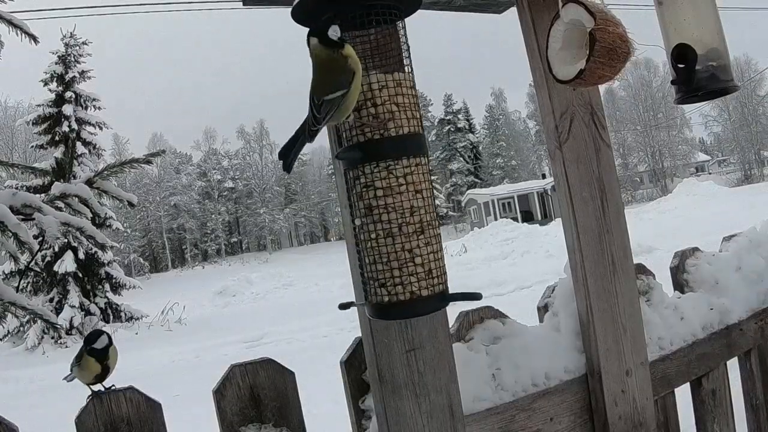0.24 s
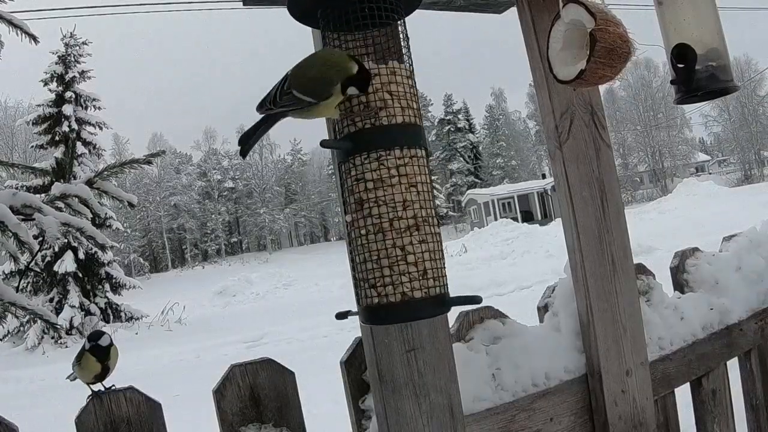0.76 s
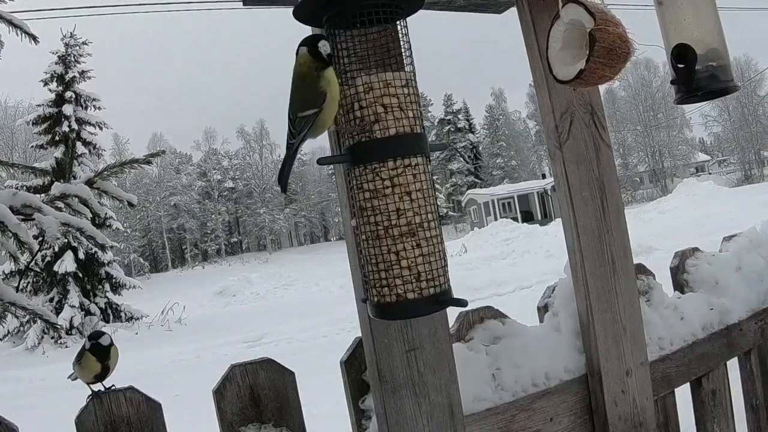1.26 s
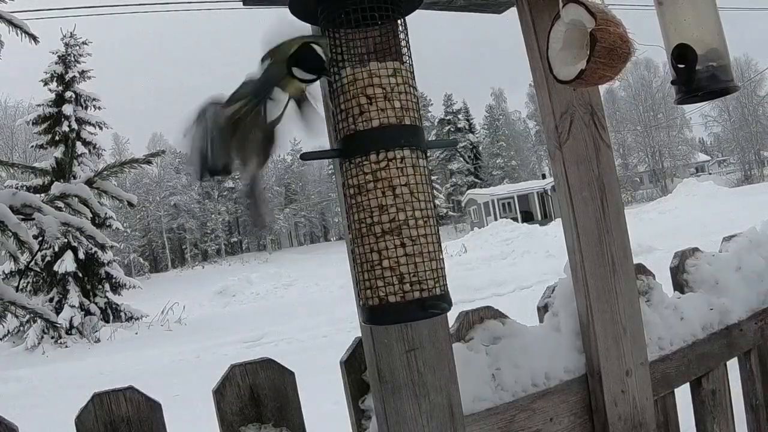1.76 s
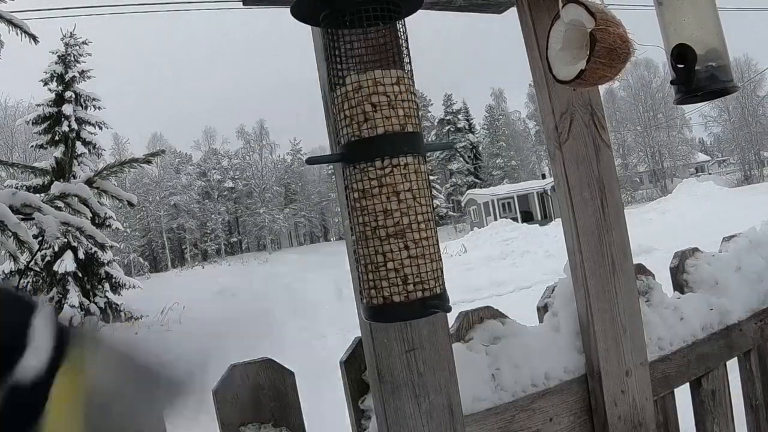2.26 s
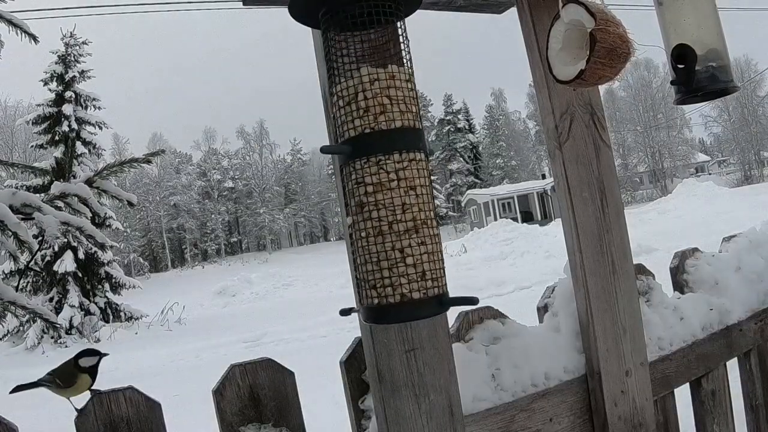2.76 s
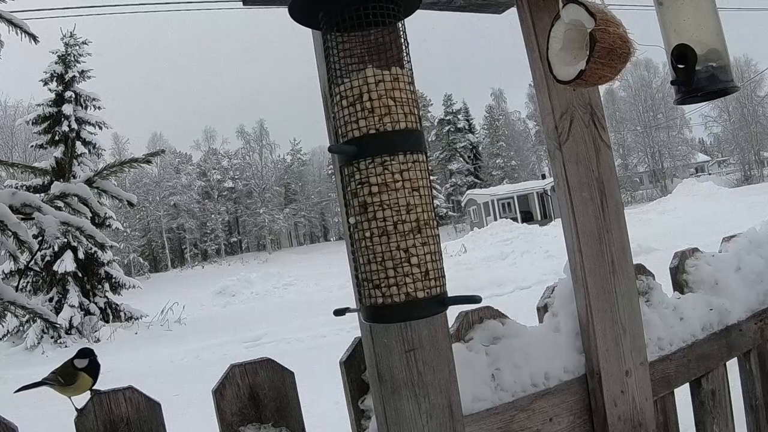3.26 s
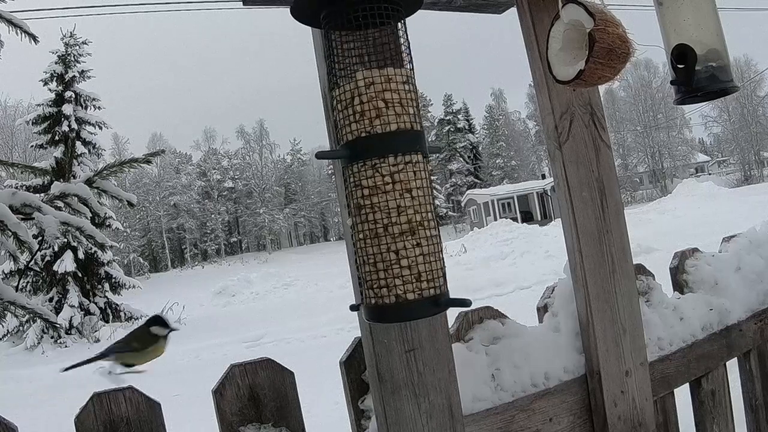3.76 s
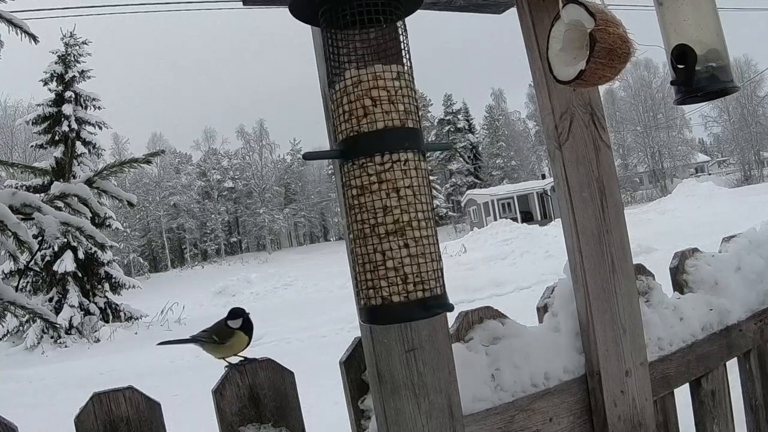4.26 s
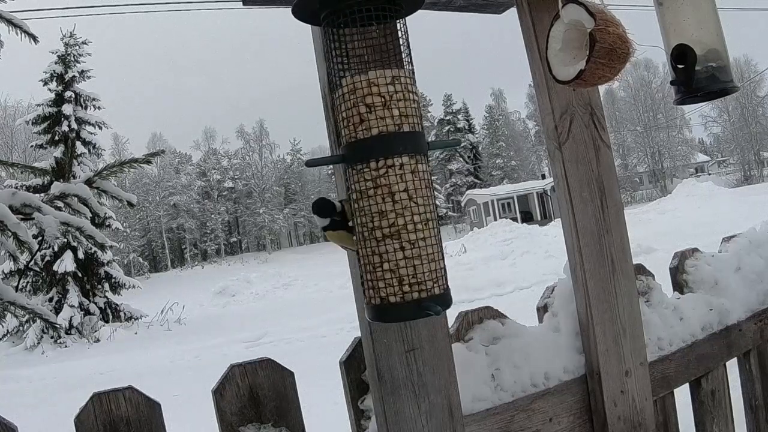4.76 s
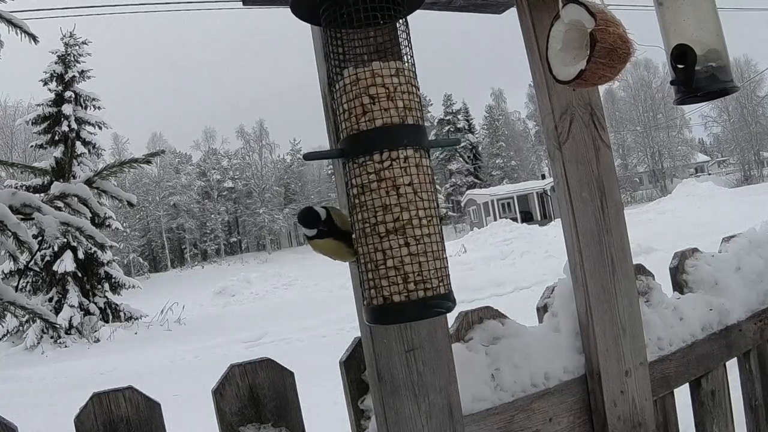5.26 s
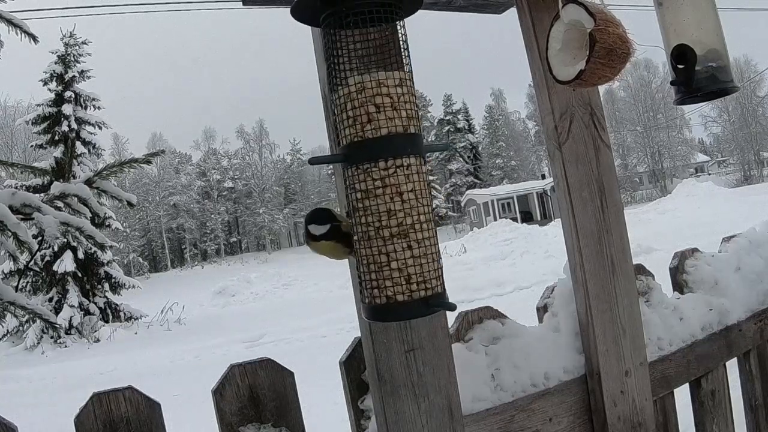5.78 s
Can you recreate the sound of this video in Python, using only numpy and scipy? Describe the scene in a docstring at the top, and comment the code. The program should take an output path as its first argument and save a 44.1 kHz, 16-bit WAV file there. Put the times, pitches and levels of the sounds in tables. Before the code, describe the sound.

A quiet winter field, a soft low rumble with barely audible distant hoots, is heard from a microphone very near a feeder. A brief wing puff and clicks open it; at 0.35 s comes a thin slurred double whistle falling raspily, with a short echo. Sparse dry ticks follow at 0.7-1.5 s. From 1.7 s wings whirr, and at 1.8-1.95 s sharp cracks and scraping mark a clash, with tiny chirps and a piercing very high squeak at 1.97 s. Heavy close wingbeats thump the microphone until 2.35 s, then airy gusts to 2.65 s. The sound, nearly mono at first, is now wide. A call at 3.15 s, soft feather shuffle and light gust at 3.3 s. Faint claw and mesh ticks at 4.6-5.15 s, a light flutter at 5.3 s, stronger wind buffets from 5.6 s, a short chirp at 5.67 s, and flapping thumps growing to the end at 6 s.

```python
"""Great tits at a winter feeder

Great tits squabble at a peanut feeder on a snowy porch, an arm's length from a small stereo microphone.
Thin slurred calls are gliding sine tones; beak and claw clicks are short filtered bursts that the posts echo.
Wings whirr past as noise beating with the stroke, their pressure waves and thumps buffeting the microphone.
Light wind on the ports is throbbing noise; the sound opens from mono to stereo over a quiet winter field."""
import sys
import numpy as np
from scipy import signal
from scipy.fft import rfft, irfft, next_fast_len
from scipy.io import wavfile

SR = 44100
rng = np.random.default_rng(int(sys.argv[2]) if len(sys.argv) > 2 else 0)


def inscribe(sig):
    """Save sig as 16-bit PCM at rate SR to the path in sys.argv[1].

    A 1-D sig is mono; a 2-D sig holds one channel per row.
    Samples are clipped to [-1, 1] before scaling.
    """
    pcm = np.round(np.clip(np.atleast_2d(sig).T, -1, 1) * 32767)
    wavfile.write(sys.argv[1], SR, pcm.astype(np.int16))


N = 265482
TIME = np.arange(N) / SR
OPPOSED = np.array([[1], [-1]])  # left and right in opposite phase


def undb(db):
    """Decibels to gain."""
    return 10 ** (np.asarray(db) / 20)


def unit(x):
    """Scale to rms 1."""
    return x / np.sqrt(np.mean(x ** 2))


def colour(x, points):
    """Filter by (Hz, dB) points joined on a log-frequency axis."""
    hz, db = np.transpose(points)
    size = next_fast_len(N + 4096)
    f = np.maximum(np.fft.rfftfreq(size, 1 / SR), 1)
    gain = undb(np.interp(np.log(f), np.log(hz), db))
    return irfft(rfft(x, size) * gain, size)[:N]


def noise(points):
    """Noise of a given spectrum, rms 1."""
    return unit(colour(rng.standard_normal(N), points))


def resonate(x, hz, width_hz):
    """Two-pole resonance."""
    b, a = signal.iirpeak(hz, hz / width_hz, fs=SR)
    return signal.lfilter(b, a, x)


def band(hz, width_hz, size):
    """Noise through a resonance twice, rms 1."""
    once = resonate(rng.standard_normal(size), hz, width_hz)
    return unit(resonate(once, hz, width_hz))


def walk(rate):
    """Random values, `rate` a second, joined by straight lines; the last is held if they run out."""
    knots = rng.standard_normal(8192)
    return np.interp(TIME * rate, np.arange(len(knots)), knots)


def throb(phase, depth):
    """One rounded peak a cycle, rms 1."""
    return unit(np.exp(depth * np.cos(phase)))


def envelope(t, attack, hold, release):
    """Straight rise, level until `hold` seconds from the start, exponential fall."""
    return np.clip(t / attack, 0, 1) * np.exp(-np.maximum(t - hold, 0) / release)


def pan(x, db):
    """Place a sound by its left minus right level."""
    return x * undb(OPPOSED * db / 2)


def add(out, start, x):
    """Mix a short sound in at a time."""
    i = max(int(start * SR), 0)
    out[..., i:i + x.shape[-1]] += x[..., :max(N - i, 0)]


# Whistled notes close to the microphone; two that overlap are the two sides of one syrinx or two birds.
# Each row: start in seconds, hold in seconds from the start, plunge in seconds, release in seconds,
# held pitch in Hz, slur from above in Hz, arch in Hz, level in dB before the beak's bass loss, swell in dB,
# plunge accent in dB, overtone in dB, left minus right in dB, left lag in seconds, echo in dB.
CALL_NOTES = [ (0.3436, 0.036, 0.014, .002, 4640, 106, -13, -58, 0, -2.5, -38, 2, 0, -13.5),
              (.346, 0.046, 0.0029, 0.0022, 5790, 497, 1002, -52.5, 17, 0, -23, 4, 0, -39),
              (1.921, 0.0073, 0.00072, 0.0046, 4380, 296, 5, -48, 13, 0, -31, 2, 0, -22),
              (1.924, 0.012, 0.0013, 0.0037, 8450, 200, -2, -62.5, 12, 0, -30, -11, 0, -12),
              (1.972, .0045, 0.00085, 0.003, 4170, 223, -1, -51.5, 2, 0, -4, 1, 0, -20),
              (1.972, 0.083, 0, .002, 8277, 420, 111, -39.5, 8, 0, -40, -6, -.00004, -14.5),
              (2.055, .0022, .0056, .0005, 8330, 0, 0, -42, 6, 5, -47, 7, .00003, -24),
              (3.1567, .039, 0.015, 0.0025, 4610, 218, 23, -54.5, 1, 3.5, -23, 4.5, -.00002, -36),
              (5.673, 0.016, 0.00018, 0.0037, 4936, 892, 5, -48, 0, -2, -34, 5.5, -.00002, -31)]
# Reflections of a call from the posts, the roof and the wall.
# Each row: delay in seconds, level in dB added to the note's own echo level.
CALL_ECHOES = [(.0052, 4), (0.012, 5), (.027, 0), (.037, -1.5)]
NOTE_ATTACK_S, SLUR_S = 0.0015, 0.00865  # a note opens quickly and settles onto its pitch
ARCH_AT, ARCH_WIDTH = 0.45, .38  # place and width of the arch, as shares of the hold
PLUNGE_S, PLUNGE_FLOOR = 0.0082, .29  # the closing plunge heads for this share of the pitch
SHORTEST_PLUNGE_S, ACCENT_S = .005, .002  # a plunge no longer than the first is left out
PLUNGE_RICHNESS = .55  # overtone gain gained per share of pitch lost below plunge_hz
BEAK_HZ, OVERTONE_TOP_HZ = 2110, 9100  # weak radiation below the first, fading overtones above the second
REFLECT_POWER = 14  # narrow posts throw back little of a note once it has dropped in pitch


def calls(waver=0.0032, flutter_db=-1.5, rasp=0.0022, plunge_rasp=0.043, plunge_hz=4400):
    """Nearly pure notes slur down and swell; some end in a raspy plunge rich in overtones; the porch echoes."""
    out = np.zeros((2, N))
    wobble = 1 + waver * walk(70)
    flutter = flutter_db * walk(90)
    jitter = walk(1500)
    for (start, hold, plunge, release, hz, slur_hz, arch_hz, db, swell_db,
         accent_db, overtone_db, pan_db, lag, echo_db) in CALL_NOTES:
        plunge = plunge if plunge > SHORTEST_PLUNGE_S else 0
        on = (TIME >= start) & (TIME < start + hold + plunge + 10 * release)
        t = TIME[on] - start
        held = np.minimum(t / hold, 1)
        falling = np.clip(t - hold, 0, plunge)
        fallen = 1 - np.exp(-(falling / PLUNGE_S) ** 2)

        slur = slur_hz * np.exp(-t / SLUR_S)
        arch = arch_hz * np.exp(-((t / hold - ARCH_AT) / ARCH_WIDTH) ** 2)
        unsteady = wobble[on] + (rasp + plunge_rasp * fallen) * jitter[on]
        pitch = (hz + slur + arch) * unsteady * (1 - (1 - PLUNGE_FLOOR) * fallen)

        accent = accent_db * np.minimum(falling / ACCENT_S, 1)
        effort = undb(db - swell_db * (1 - held) + accent + flutter[on])
        beak = 1 / np.hypot(1, (BEAK_HZ / pitch) ** 3)
        phase = 2 * np.pi * (np.cumsum(pitch) / SR - OPPOSED * pitch * lag / 2)
        overtone = undb(overtone_db) + PLUNGE_RICHNESS * np.clip(1 - pitch / plunge_hz, 0, .5)
        tone = np.sin(phase)
        for k in range(2, 5):
            audible = (k * pitch < SR / 2) / np.hypot(1, (k * pitch / OVERTONE_TOP_HZ) ** 2)
            tone = tone + overtone ** (k - 1) * np.sin(k * phase) * audible
        note = np.sqrt(2) * tone * effort * beak * envelope(t, NOTE_ATTACK_S, hold + plunge, release)
        out[:, on] += pan(note, pan_db)
        for delay, wall_db in CALL_ECHOES:
            add(out, start + delay, undb(echo_db + wall_db) * note * (1 - fallen) ** REFLECT_POWER)
    return out


# Birds flying past the microphone, or in to land.
# Each row: start in seconds, end in seconds, closest moment in seconds, passing time in seconds,
# pushed air in dB, feather swish in dB, swish side against mid in dB, moment of one downstroke in seconds,
# beats per second, nearness from 0 to 1.
FLIGHTS_PAST = [ (-.05, 0.07, 0, 0.062, -40.5, -69.5, -7, 0.013, 22, .92),
                (1.686, 1.855, 1.87, 0.18, -48, -70.5, -6, 1.67, 22.7, 0.6),
                (1.795, 2.002, 2, 0.27, -59, -62, -7, 1.73, 18.3, 0.4),
                (1.988, 2.195, 2, 0.12, -33, -64, -2, 2.133, 23.3, .98),
                (2.197, 2.36, 2.28, .13, -34.5, -64, -2, 2.304, 21, 0.95),
                (2.366, 2.477, 2.5, 0.26, -55, -68, -2, 2.52, 24, 0.5),
                (5.236, 5.44, 5.5, 0.2, -45, -68.5, 0.5, 5.382, 23.4, 0.14),
                (5.756, 6.1, 6, 0.3, -35, -66.5, -1, 5.9, 18.7, 0.98)]
# Air pushed by a very near wing. Each row: frequency in Hz, density in dB.
NEAR_AIR = [(12, -42), (20, -2.5), (43, 5), (80, -7), (134, -9), (210, -15.5), (262, -25), (386, -32.5),
            (700, -53), (1000, -64), (1540, -100)]
# Air of a wing further off. Each row: frequency in Hz, density in dB.
FAR_WHIRR = [(20, -20), (65, -2.5), (150, 4), (250, -5.5), (400, -20), (800, -33), (2000, -79)]
# Rustle of feathers. Each row: frequency in Hz, density in dB.
FEATHER_RUSTLE = [(300, 6.5), (700, 4), (1500, 4.5), (3000, 2), (6500, 0), (8500, -18), (11000, -22.5),
                  (15000, -32)]
AIR_FALLOFF, SWISH_FALLOFF = 3.57, 2.3  # powers of distance: pushed air dies much faster than sound
FLIGHT_EDGE_S, SWISH_LEAD_S = 0.034, 0.0027  # wings start within a beat; the swish comes just before the puff
AIR_RELEASE_S, SWISH_RELEASE_S = 0.036, 0.063  # dying away once the bird has landed or gone
BEAT_PUSH, TURN_PUSH = 0.27, 0.72  # pressure wave once a beat, and at both turns of the wing


def wings(air_throb=0.47, whirr_throb=1.11, swish_throb=0.21, air_side_db=-11, whirr_side_db=-8,
          grain_db=2.5, uneven_db=1.44):
    """Downstrokes push turbulent air at the microphone and make feathers swish; both fade with distance."""
    puffs = noise(NEAR_AIR) + OPPOSED * undb(air_side_db) * noise(NEAR_AIR)
    whirr = noise(FAR_WHIRR) + OPPOSED * undb(whirr_side_db) * noise(FAR_WHIRR)
    rustle, scattered = noise(FEATHER_RUSTLE), noise(FEATHER_RUSTLE)
    grain = undb(grain_db * walk(650) + uneven_db * walk(70))
    out = np.zeros((2, N))
    for start, end, closest, passing, air_db, swish_db, side_db, downstroke, rate, near in FLIGHTS_PAST:
        away = np.hypot(1, (TIME - closest) / passing)  # distance over the closest distance
        stroke = 2 * np.pi * rate * (TIME - downstroke)
        # only a very near wing is felt as a deep pressure wave; further off it whirrs on both strokes
        wave = BEAT_PUSH * np.cos(stroke) + TURN_PUSH * np.cos(2 * stroke)
        near_air = np.sqrt(near) * throb(stroke, air_throb) * puffs
        far_air = np.sqrt(1 - near) * throb(2 * stroke, whirr_throb) * whirr
        air = near_air + far_air + near * wave

        early_stroke = stroke + 2 * np.pi * rate * SWISH_LEAD_S
        feathers = rustle + OPPOSED * undb(side_db) * scattered
        swish = throb(early_stroke, swish_throb) * grain * feathers

        air_shape = envelope(TIME - start, FLIGHT_EDGE_S, end - start, AIR_RELEASE_S)
        swish_shape = envelope(TIME - start, FLIGHT_EDGE_S, end - start, SWISH_RELEASE_S)
        out += air * undb(air_db) / away ** AIR_FALLOFF * air_shape
        out += swish * undb(swish_db) / away ** SWISH_FALLOFF * swish_shape
    return out


# Crisp flaps of the wing feathers as a bird brakes or turns.
# Each row: middle in seconds, level in dB, half length in seconds, left minus right in dB.
WING_FLAPS = [(1.701, -68.5, .004, 0), (1.743, -68.5, .007, -2), (1.827, -51.5, 0.0038, 3),
              (1.872, -57.5, 0.0026, -2), (1.99, -54, 0.0031, 0), (2.308, -65, 0.0034, 3),
              (2.058, -59, 0.0044, 2), (2.106, -54, 0.0054, -5), (2.137, -57.5, .003, -7),
              (2.179, -55.5, 0.0022, -14), (2.256, -57.5, 0.0023, 3), (2.479, -65, .005, 3),
              (5.299, -65, 0.0049, -3), (5.378, -63, 0.0062, -6), (5.418, -67, .005, -8),
              (5.735, -60.5, .007, -7), (5.831, -61, 0.0081, -9), (5.93, -65, .007, -10),
              (5.971, -57.5, 0.0064, -10), (6.013, -51.5, 0.0088, -6)]
# Sound of one flap. Each row: frequency in Hz, density in dB.
FLAP_SPECTRUM = [(100, 4), (450, 11.5), (900, 3.5), (1700, 4), (3000, 0.5), (6300, -.5), (8500, -17.5),
                 (11000, -27), (15000, -33)]


def flaps(spread=0.6, grain_db=3.0):
    """Stiff feathers slide over each other in a short, grainy burst."""
    feathers = noise(FLAP_SPECTRUM) + OPPOSED * spread * noise(FLAP_SPECTRUM)
    strength = np.zeros((2, N))
    for s, db, length, pan_db in WING_FLAPS:
        strength += pan(undb(db) * np.exp(-((TIME - s) / length) ** 2), pan_db)
    return feathers * undb(grain_db * walk(900)) * strength


# Close wing strokes that thump the microphone.
# Each row: moment in seconds, pressure in dB, half width in seconds, 1 for push or -1 for suction,
# puff of air in dB.
WING_THUMPS = [(.008, -35, 0.0025, -1, -60), (2.051, -30.5, .0013, 1, -52), (2.106, -32, .0016, 1, -46),
               (2.178, -33.5, 0.0019, 1, -47.5), (2.253, -22, .0021, -1, -48),
               (2.304, -25, 0.0019, 1, -55.5), (2.321, -27.5, 0.0027, 1, -59), (5.739, -33, 0.0052, 1, -65),
               (5.838, -31, .005, 1, -54), (5.979, -25, 0.0052, 1, -56), (6.006, -30, 0.0016, 1, -48),
               (6.0135, -20.5, .0015, 1, -46)]
# Turbulence inside a thump. Each row: frequency in Hz, density in dB.
PUFF_SPECTRUM = [(90, -5), (200, 0), (400, -1), (650, -11), (900, -22), (2000, -49)]
PUFF_S = .006  # half length of the turbulence


def thumps():
    """A vortex shed by a close wing: a pressure peak between two shallow troughs, in a puff of turbulence."""
    out, puff = np.zeros(N), noise(PUFF_SPECTRUM)
    for s, db, width, sign, puff_db in WING_THUMPS:
        near = abs(TIME - s) < .05
        t = TIME[near] - s
        u = (t / width) ** 2
        out[near] += sign * undb(db) * (1 - u) * np.exp(-u / 2)
        out[near] += undb(puff_db) * np.exp(-(t / PUFF_S) ** 2) * puff[near]
    return out


# The clearest beak, claw and wing-tip clicks at the feeder.
# Each row: start in seconds, peak in dB, centre in Hz, width in octaves, tail's 60 dB decay in seconds,
# left minus right in dB.
FEEDER_CLICKS = [(.024, -53.5, 4170, 0.7, 0.042, -6), (.096, -60, 2280, 1.9, 0.044, -2),
                 (0.7190, -52, 5060, 1.04, 0.015, -12), (0.7840, -60, 4005, 1.3, 0.024, -1),
                 (.9626, -65.5, 4250, .9, 0.045, 6), (1.5156, -68.5, 4200, 1.3, .023, 0),
                 (1.8123, -40, 3180, 1.5, 0.022, 0), (1.8525, -32.5, 2900, 2.1, 0.0078, 1),
                 (1.9444, -31.5, 2420, 0.83, 0.014, 5), (1.944, -43, 6100, 0.34, 0.017, -1),
                 (2.3564, -55.5, 5370, .9, 0.037, -6), (2.439, -41.5, 6950, 1.5, 0.017, 3),
                 (2.541, -53, 3770, 1.3, .02, -4), (2.962, -51, 6350, 1.7, 0.016, 5),
                 (3.347, -60, 2980, 1.3, .04, -5), (4.581, -64.5, 3400, 1.2, 0.068, -3),
                 (4.616, -64, 4000, 1.7, 0.022, -4), (4.664, -62, 6070, 0.76, .05, -6),
                 (4.746, -58.5, 5660, 0.79, .03, -6), (4.7776, -52.5, 5000, 1, 0.013, -3),
                 (4.797, -60, 5760, 0.92, 0.029, -5), (5.042, -61, 4200, 1.6, 0.022, -4),
                 (5.135, -61, 7500, 1.12, .014, -2), (5.761, -46, 3100, 2.1, 0.015, -2),
                 (5.784, -48, 4040, 1.4, 0.042, -9)]
CRACK, CRACK_S = 1, 0.00053  # the first crack against the tail, and its decay in seconds


def clicks(spread=0.56):
    """Dry ticks on wire mesh, nuts and wood: a crack and a short tail, broad or ringing with what is struck."""
    out, t = np.zeros((2, N)), TIME[:6000]
    for s, db, hz, octaves, t60, pan_db in FEEDER_CLICKS:
        half = 2 ** (octaves / 2)
        decay = undb(-60 * t / t60) + CRACK * np.exp(-t / CRACK_S)
        direct, scattered = rng.standard_normal((2, len(t))) * decay
        body = signal.butter(3, [hz / half, hz * half], "band", fs=SR, output="sos")
        tick = signal.sosfilt(body, direct + OPPOSED * spread * scattered)
        add(out, s, pan(tick * undb(db) / abs(tick).max(), pan_db))
    return out


# Spells of scraping claws and clashing feathers.
# Each row: start in seconds, end in seconds, scrapes per second, level of the strongest in dB.
SCRAPE_SPELLS = [(1.798, 2.029, 45, -54), (4.196, 5.253, 35, -78), (4.551, 5.151, 16, -73),
                 (4.743, 4.802, 90, -76)]


def scratches(scatter_db=4, decay=0.0066):
    """Tiny scrapes at random moments as the birds shift on fence and mesh or brush each other."""
    strength = np.zeros(N)
    for start, end, rate, db in SCRAPE_SPELLS:
        chance = rng.random((256, 2))
        for place, size in chance[:int(rate * (end - start))]:
            level = undb(db + scatter_db * np.sqrt(12) * (size - 1.0))
            add(strength, start + place * (end - start), level * np.exp(-TIME[:1024] / decay))
    return strength * noise(FEATHER_RUSTLE)


def shuffle(s=3.36, width_s=0.067, level_db=-74):
    """A bird on the fence softly shakes its feathers."""
    swell = np.exp(-((TIME - s) / width_s) ** 2)
    return undb(level_db + 2 * walk(100)) * swell * noise(FEATHER_RUSTLE)


def porch(x, t60=.2, wet_db=-20, first_s=.004):
    """Posts, roof and fence scatter a short, weak echo; snow swallows the rest."""
    t = TIME[:SR // 2]
    echo = rng.standard_normal((2, len(t))) * undb(-60 * t / t60) * (t > first_s)
    echo /= np.linalg.norm(echo, axis=1)[:, None]
    return x + undb(wet_db) * signal.fftconvolve(x.mean(axis=0)[None], echo, axes=1)[:, :N]


# Gusts on the microphone ports, each a low buffet and a rush of air that rings in the port.
# Each row: start in seconds, attack in seconds, hold in seconds from the start, buffet in dB, rush in dB,
# ring in Hz before its wander.
PORT_GUSTS = [(2.368, 0.017, 0.024, -41.5, -44, 900), (2.403, 0.0086, 0.015, -41.5, -44, 899),
              (2.43, 0.0076, 0.017, -44, -45, 951), (2.45, .01, 0.064, -50.5, -54.5, 950),
              (2.545, 0.014, 0.027, -56, -49.5, 950), (2.574, 0.01194, .028, -43, -55, 1003),
              (2.61, 0.0075, 0.031, -66, -51, 1300), (3.275, .012, .016, -62, -59, 978),
              (3.312, 0.00784, 0.015, -57, -51, 952), (3.335, 0.013, 0.023, -56, -52.5, 1350),
              (4.852, 0.0121, 0.033, -62, -58.5, 1050), (4.885, .012, 0.023, -60, -50.5, 1000),
              (4.915, 0.015, .03, -55, -59.5, 1280), (5.588, 0.0066, 0.086, -46.5, -43, 974),
              (5.627, .008, 0.017, -34.5, -37, 981), (5.65, 0.0052, 0.014, -40, -49, 980),
              (5.66, .01, 0.054, -46, -47.5, 947), (5.715, .01, .06, -50.5, -53, 950),
              (5.775, 0.0183, 0.087, -48.5, -44, 1300), (5.882, 0.0093, .016, -47, -38.5, 1250),
              (5.922, .012, .04, -44, -41.5, 1166), (5.96, 0.0063, 0.0083, -38.5, -35.5, 1050),
              (5.998, 0.007, .02, -38, -51, 1000)]
# Low push of a gust. Each row: frequency in Hz, density in dB.
GUST_BUFFET = [(40, -29), (88, -31), (145, 7.5), (205, -4), (290, -5.5), (390, -3.5), (700, -23.5),
               (1500, -62)]
# Rush of air over the port. Each row: frequency in Hz, density in dB.
GUST_RUSH = [(200, -23), (450, -7), (610, -11.5), (780, -6), (950, 0.5), (1130, -6.5), (1370, -3.5),
             (1800, -14.5), (2300, -28.5), (3200, -42), (6000, -62)]
# Share of a gust that both channels have in common. Each row: frequency in Hz, gain in dB.
GUST_COMMON = [(60, -15.5), (170, 0.5), (300, -3), (600, -23), (1500, -13.5), (3000, -5)]
EDDY_RELEASE_S = 0.013
# the rush rings in the port at a pitch that wanders with the flow
PORT_WANDER_OCTAVES, PORT_WIDTH_HZ = .17, 150


def eddies(rough_db=2.0, lumpy_db=-0.1, ring_db=-5, common_db=-17, hiss_db=-32):
    """Turbulence on the right port: bass stays mostly on that side, the rest comes out in opposite phase."""
    buffet_power, rush_power = np.zeros(N), np.zeros(N)
    for start, attack, hold, buffet_db, rush_db, _ in PORT_GUSTS:
        shape = envelope(TIME - start, attack, hold, EDDY_RELEASE_S)
        buffet_power += (undb(buffet_db) * shape) ** 2
        rush_power += (undb(rush_db) * shape) ** 2
    buffet = np.sqrt(buffet_power)
    rush = np.sqrt(rush_power) * undb(rough_db * walk(260) + lumpy_db * walk(60))

    port_hz = np.interp(TIME, [row[0] + row[1] for row in PORT_GUSTS], [row[-1] for row in PORT_GUSTS])
    phase = 2 * np.pi * np.cumsum(port_hz * 2 ** (PORT_WANDER_OCTAVES * walk(45))) / SR
    ring = unit(walk(PORT_WIDTH_HZ) * np.cos(phase) + walk(PORT_WIDTH_HZ) * np.sin(phase))

    gust = buffet * noise(GUST_BUFFET) + rush * unit(noise(GUST_RUSH) + undb(ring_db) * ring)
    shared = undb(common_db) * noise(GUST_RUSH) + undb(hiss_db) * noise(FEATHER_RUSTLE)
    return OPPOSED * gust - colour(gust, GUST_COMMON) + rush * shared


# Spectrum of the open field. Each row: frequency in Hz, density in dB.
FIELD_SPECTRUM = [(12, -34), (20, 5), (91, -8), (172, 4.5), (378, -13.5), (452, -14), (677, -12),
                  (809, -9.5), (895, -13), (966, -18), (1120, -20.5), (3520, -43), (4530, -44.5),
                  (5020, -39.5), (8540, -38), (11100, -43.5), (18800, -120)]
# Level of the quiet field. Each row: time in seconds, level in dB.
FIELD_LEVEL = [(0, -67.5), (1.2, -69.5), (1.5, -69), (6, -67)]
# Narrow, wavering low hums that come and go.
# Each row: start in seconds, end in seconds, centre in Hz, width in Hz, starting level in dB,
# fade in dB per second (negative grows).
LOW_HUMS = [(0.032, .32, 160, 28, -62, -1), (.24, 0.355, 188, 23.9, -62, -3), (0, .44, 240, 10, -68, 6),
            (0, 1.1, 120, 3.6, -69, 5)]
# Faint far-off hoots, perhaps a dog, blurred by the forest.
# Each row: middle in seconds, length in seconds, pitch in Hz, blur in Hz, level in dB, overtone in dB.
FAR_HOOTS = [(0.373, 0.17, 566, 40, -74.5, -22), (0.672, .19, 790, 420, -77.5, -7),
             (.86, 0.23, 710, 420, -77.5, -2.5), (.91, 0.23, 980, 90, -77.5, -21),
             (1.129, 0.23, 970, 121, -76.5, -18), (1.399, 0.14, 970, 70, -78, -22),
             (1.581, 0.25, 720, 89.5, -72, -26), (1.623, .17, 470, 130, -70.5, -24),
             (2.89, 0.24, 565, 220, -70, -15), (3.703, .22, 583, 220.5, -71, -8.5),
             (4.11, 0.27, 760, 130, -69.5, -22)]
MURMUR_ATTACK_S, MURMUR_RELEASE_S = 0.038, .035


def distance(waver_db=2.0, band_hz=4370, band_width_hz=850, band_db=-86, band_peak_s=0.41, band_fade_db=6):
    """The quiet field with its passing hums, a faint high band that swells and fades, and far, smeared hoots."""
    out = noise(FIELD_SPECTRUM) * undb(np.interp(TIME, *np.transpose(FIELD_LEVEL)) + .4 * walk(7))
    swell_db = band_db - band_fade_db * abs(TIME - band_peak_s)
    out += band(band_hz, band_width_hz, size=N) * undb(swell_db + walk(6.6))
    for start, end, hz, width_hz, db, fade_db in LOW_HUMS:
        t = np.maximum(TIME - start, 0)
        pitch = hz + width_hz / 2 * walk(width_hz * 2)
        hum = np.sqrt(2) * np.sin(2 * np.pi * np.cumsum(pitch) / SR)
        level = undb(db - fade_db * t + waver_db * walk(30))
        out += hum * level * envelope(t, MURMUR_ATTACK_S, end - start, MURMUR_RELEASE_S)
    for s, length, hz, blur_hz, db, overtone_db in FAR_HOOTS:
        swell = np.hanning(int(length * SR))
        # the end of a longer noise, once the resonance has built up
        first, second = (band(k * hz, k * blur_hz, size=SR)[-len(swell):] for k in (1, 2))
        add(out, s - length / 2, undb(db) * swell * (first + undb(overtone_db) * second))
    return out


def scene():
    """Birds close by, wind on the ports, the field behind."""
    echoed = porch(calls() + clicks() + scratches() + shuffle())
    return echoed + wings() + flaps() + thumps() + eddies() + distance()


# Stereo opening of the microphone. Each row: time in seconds, share from 0 to 1.
STEREO_WIDTH = [(1.12, 0), (1.6, 0.48), (2.1, 1), (2.6, 1)]
# Noise between the closely spaced ports. Each row: frequency in Hz, density in dB.
PORT_SPECTRUM = [(12, -50), (20, -22), (85, -16.5), (172, 1.5), (211, -4), (246, -12), (294, -19.5),
                 (582, -22.5), (789, -14), (1040, -23.5), (1340, -26.5), (2870, -44), (4420, -48.5),
                 (5690, -41.5), (8540, -45), (11100, -48.5), (18800, -120)]
# Hiss common to both channels. Each row: frequency in Hz, density in dB.
HISS_SPECTRUM = [(300, 6.5), (1300, 7), (2500, -3), (4200, -3), (6000, -1.5), (8000, -7.5), (11500, -9.5),
                 (13000, -28)]
TOP_HZ = 15800  # nothing much is heard above this


def record(dry, port_db=-59, hiss_db=-78):
    """Stereo opens slowly and brings up the noise of the closely spaced ports; the top is cut."""
    width = np.interp(TIME, *np.transpose(STEREO_WIDTH))
    mid = dry.mean(axis=0) + width ** 2 * undb(hiss_db) * noise(HISS_SPECTRUM)
    side = width * ((dry[0] - dry[1]) / 2 + undb(port_db) * noise(PORT_SPECTRUM))
    top_cut = signal.ellip(8, .2, 70, TOP_HZ, fs=SR, output="sos")
    return signal.sosfilt(top_cut, mid + OPPOSED * side)


dry = scene()
out = record(dry)
inscribe(out)
```